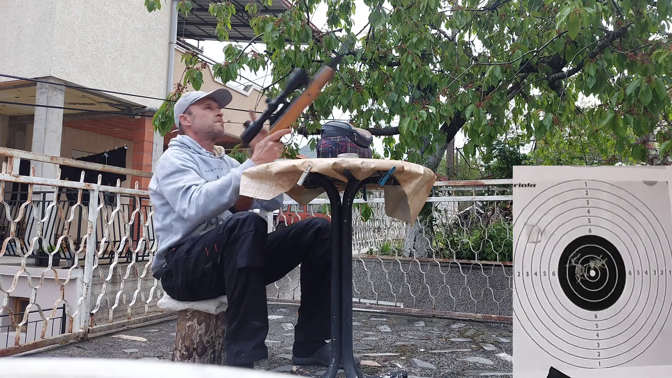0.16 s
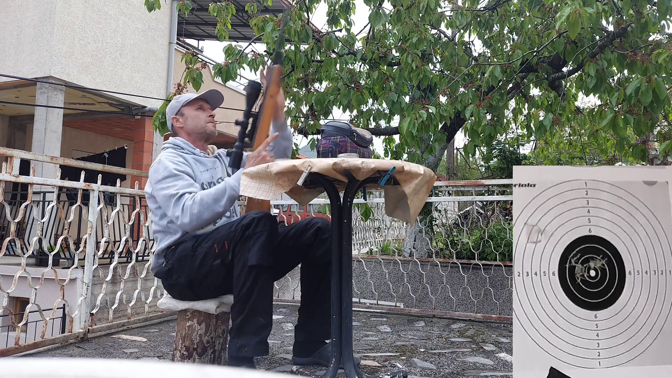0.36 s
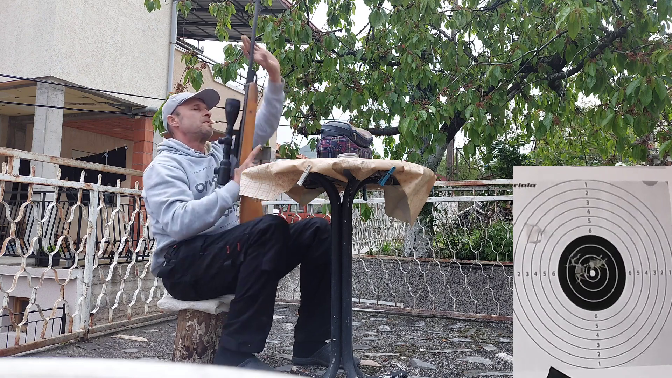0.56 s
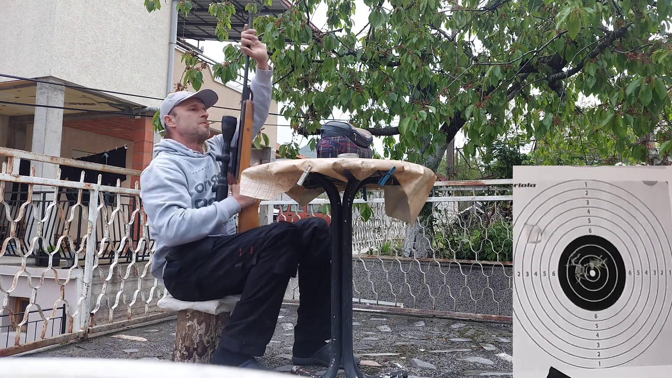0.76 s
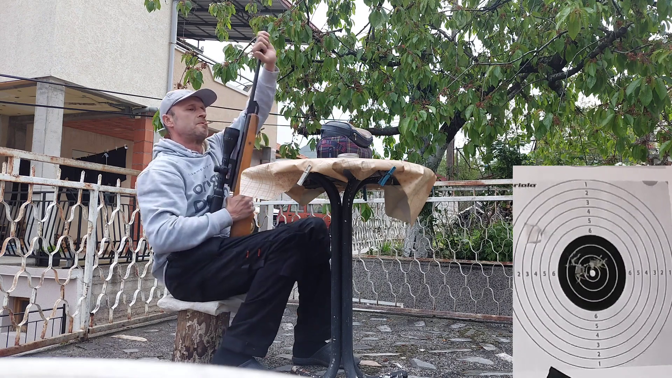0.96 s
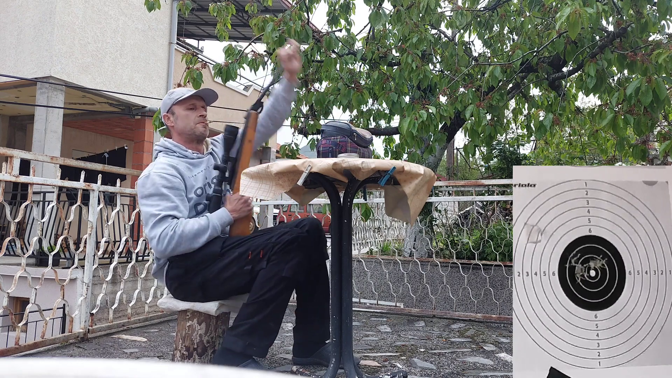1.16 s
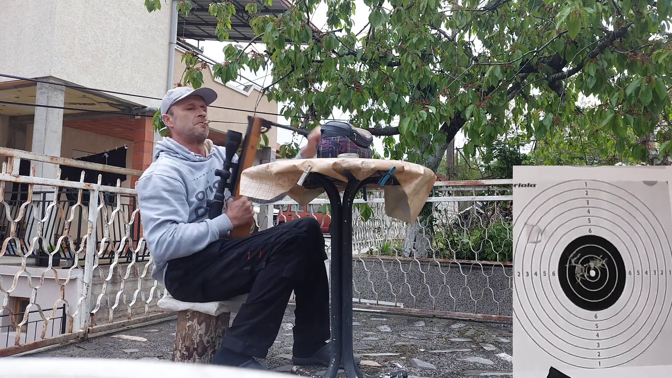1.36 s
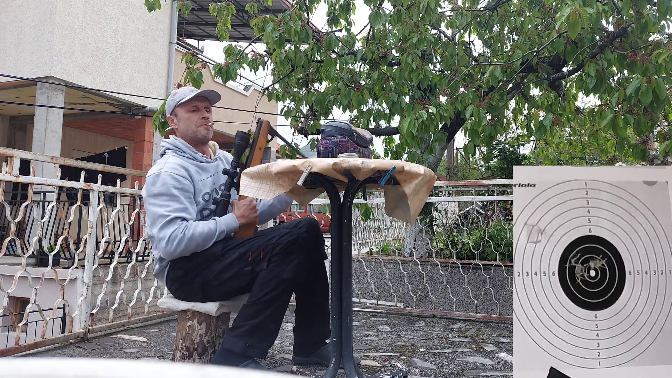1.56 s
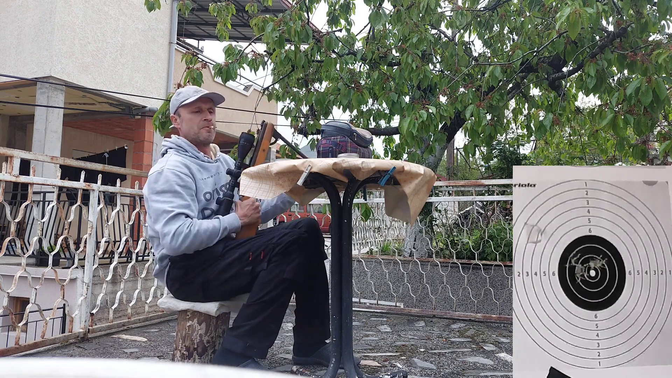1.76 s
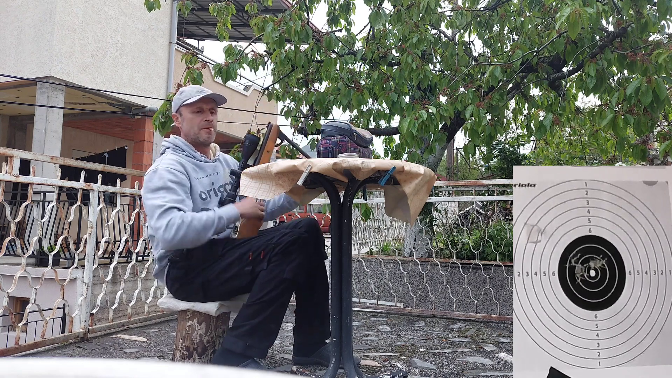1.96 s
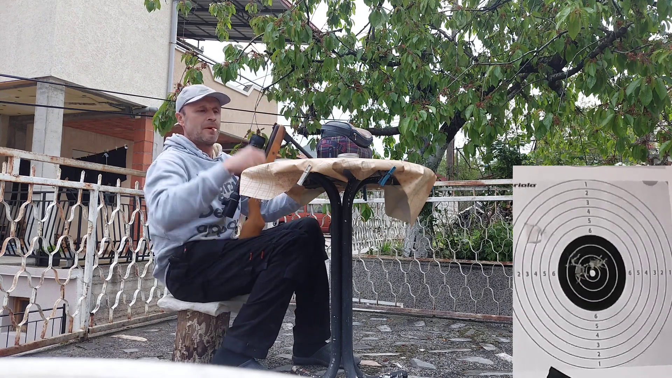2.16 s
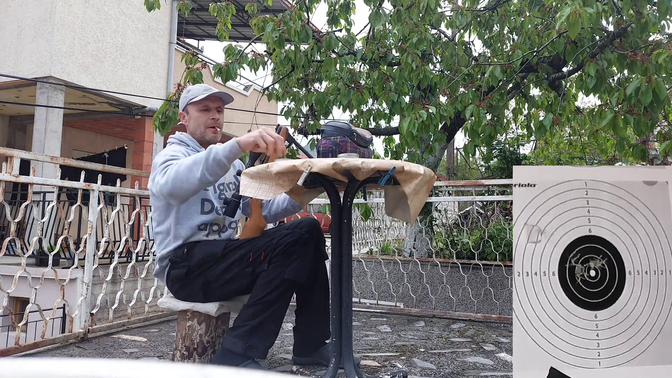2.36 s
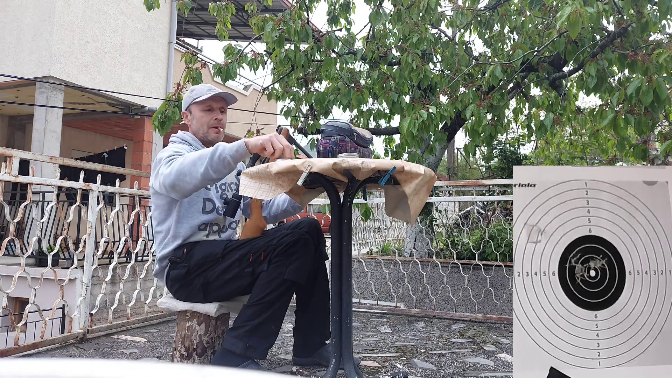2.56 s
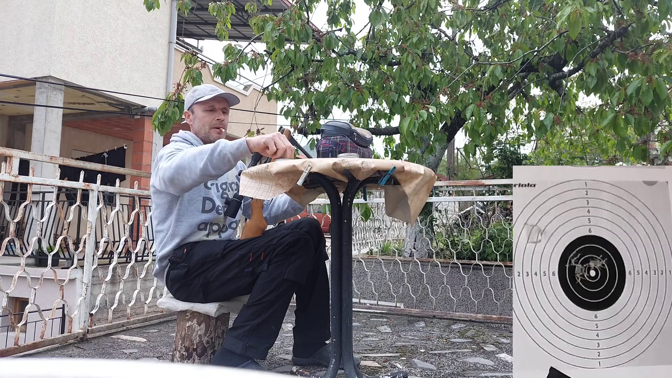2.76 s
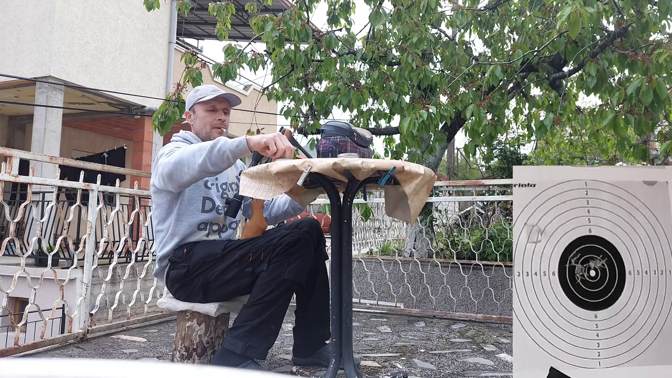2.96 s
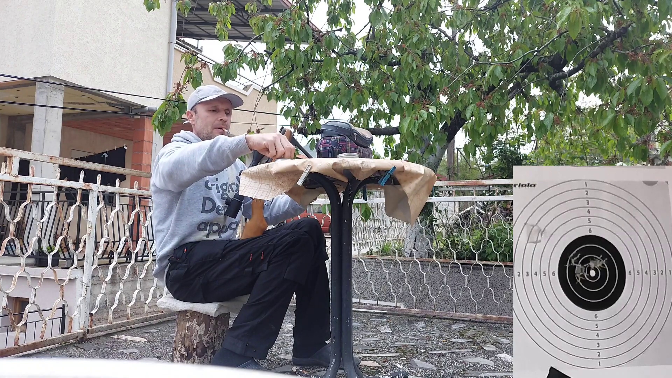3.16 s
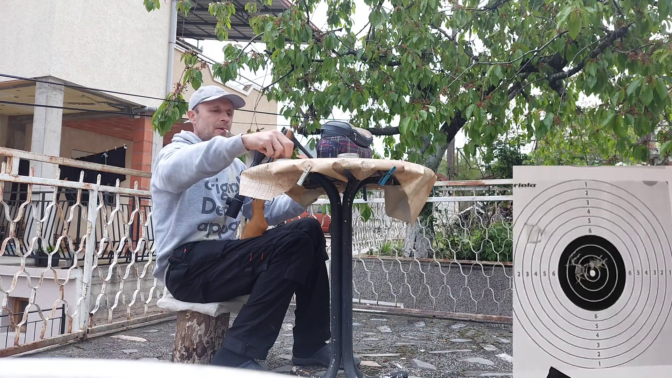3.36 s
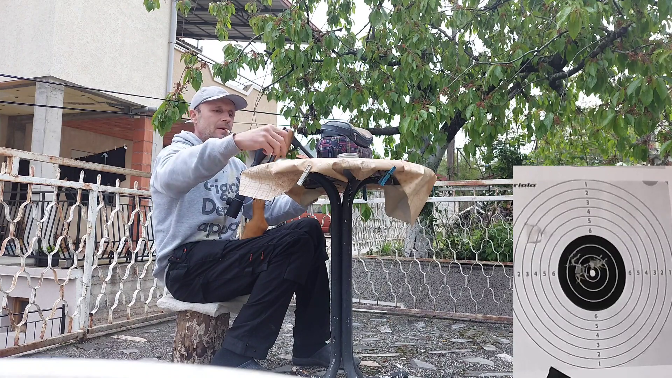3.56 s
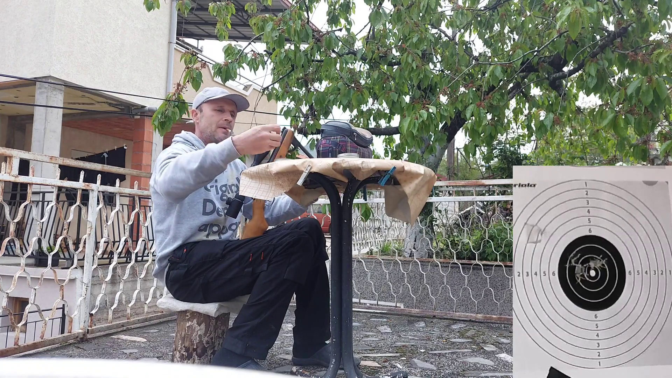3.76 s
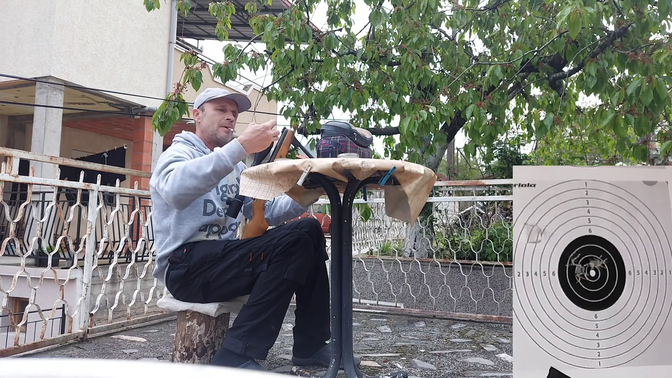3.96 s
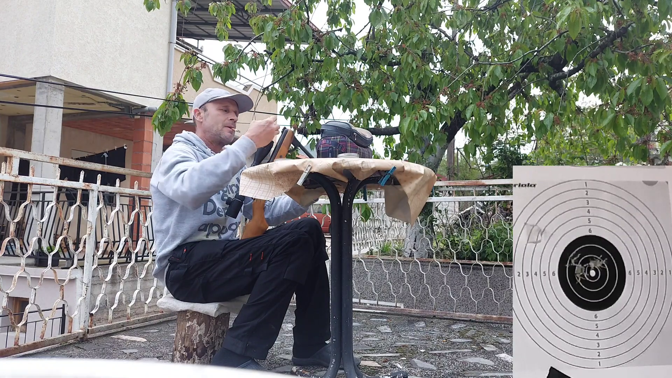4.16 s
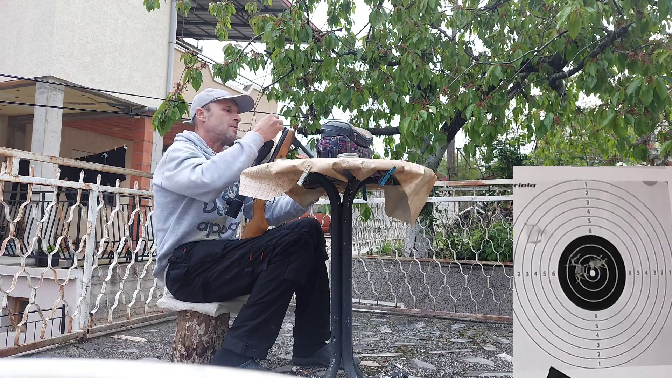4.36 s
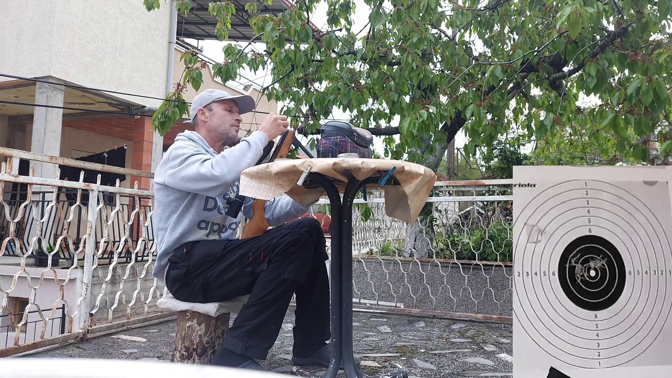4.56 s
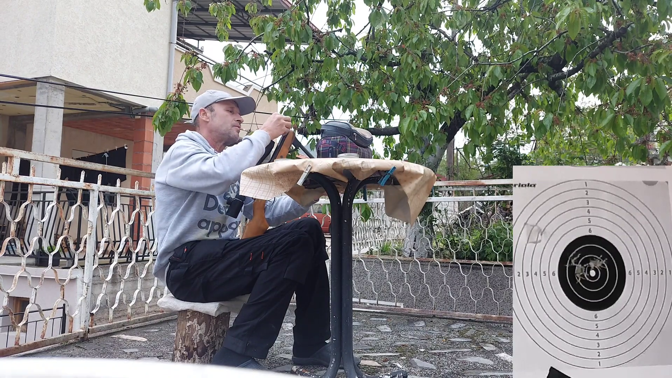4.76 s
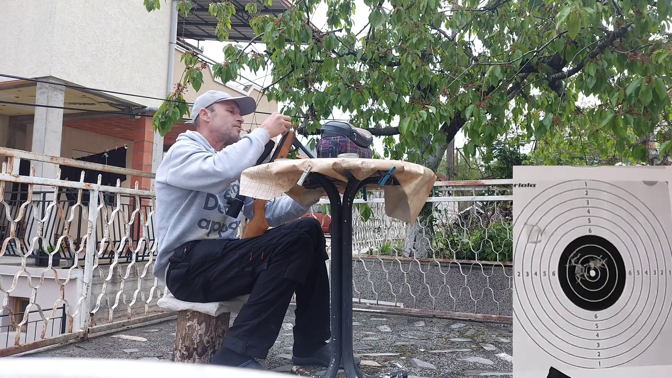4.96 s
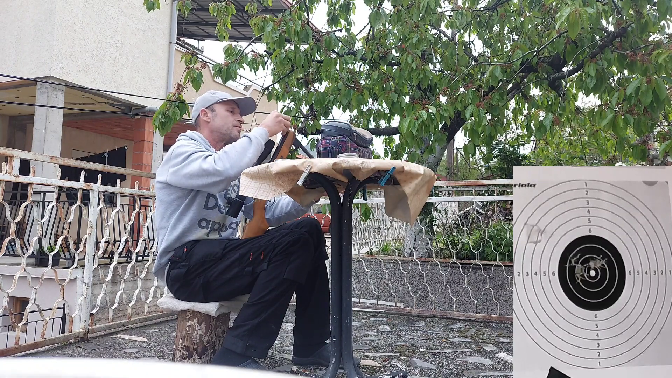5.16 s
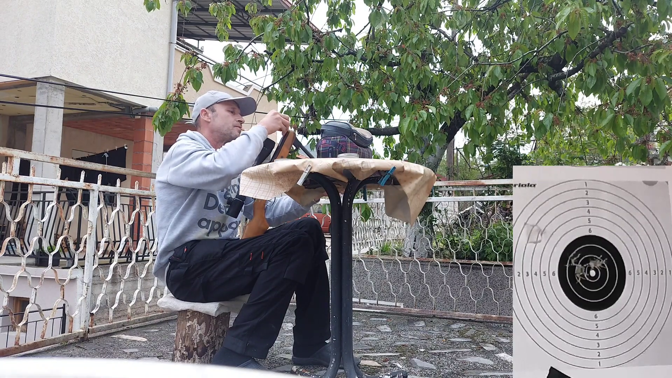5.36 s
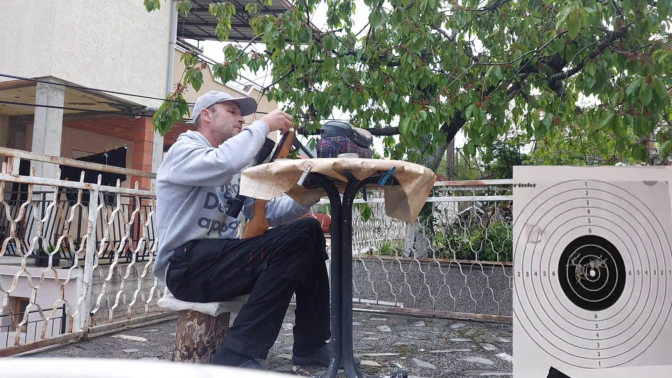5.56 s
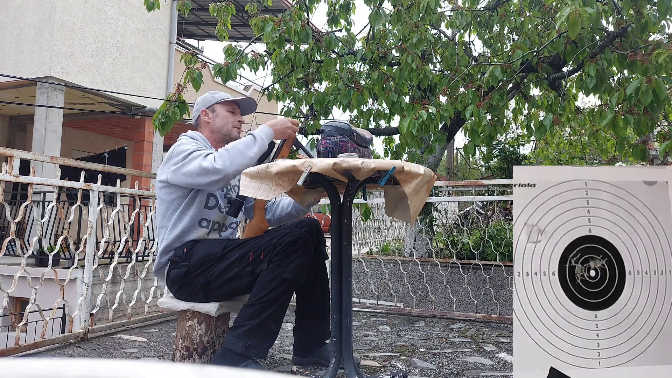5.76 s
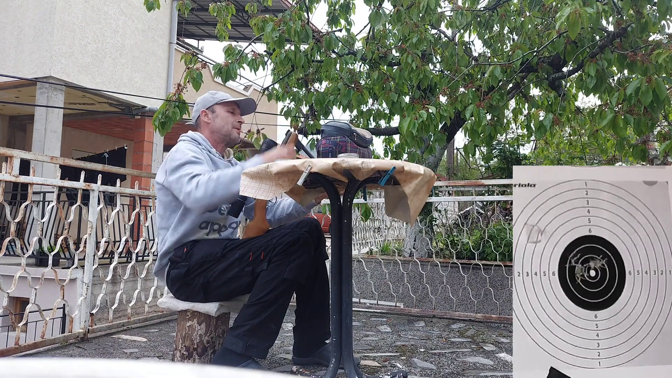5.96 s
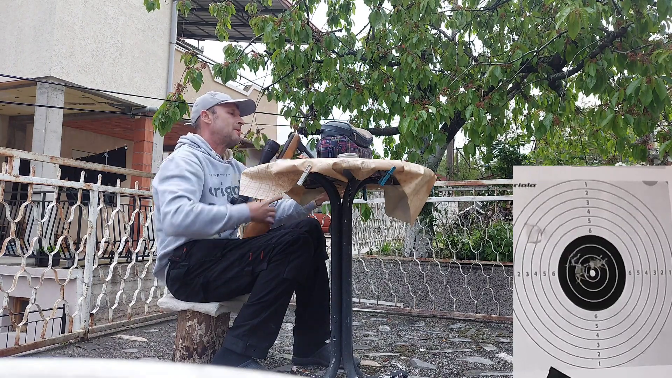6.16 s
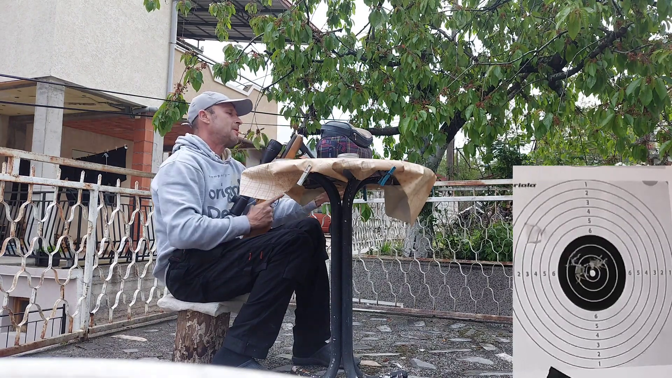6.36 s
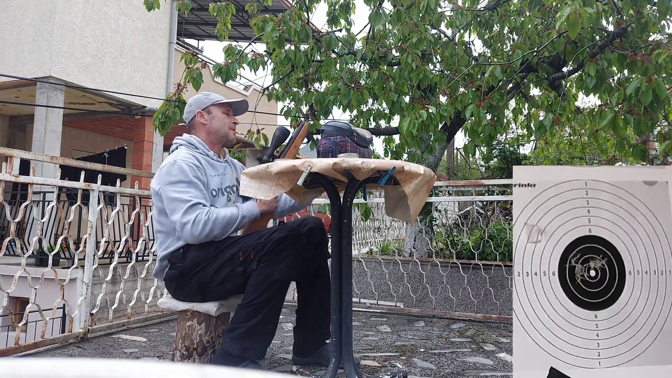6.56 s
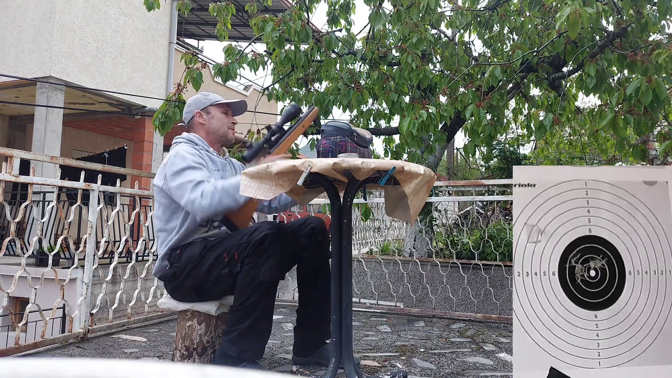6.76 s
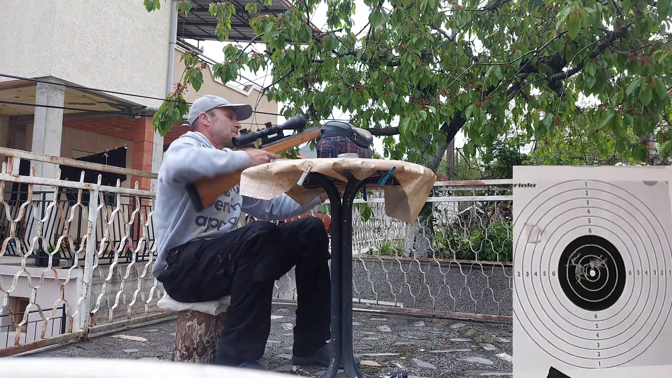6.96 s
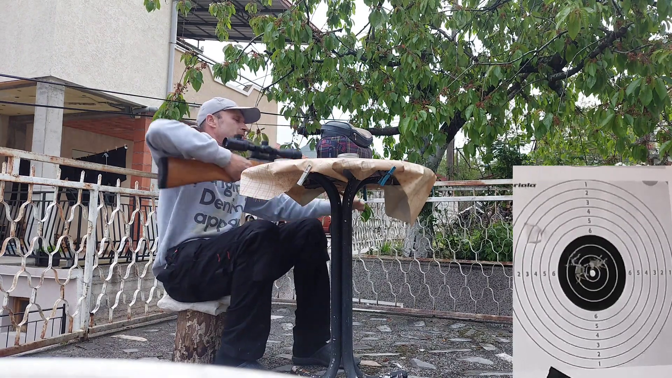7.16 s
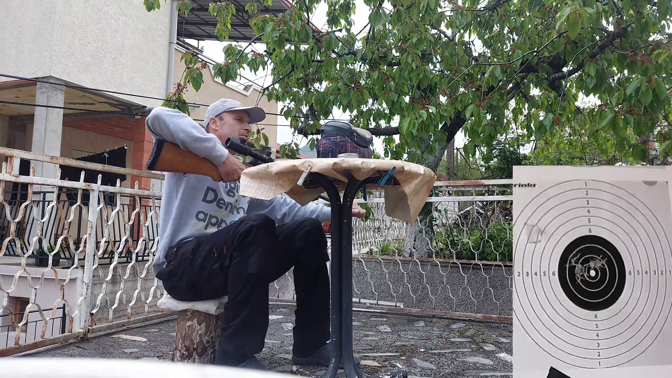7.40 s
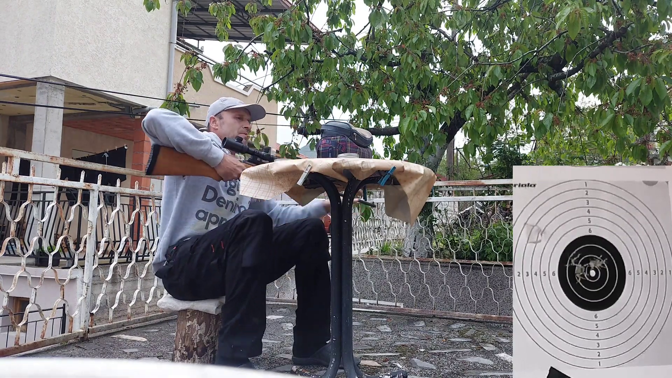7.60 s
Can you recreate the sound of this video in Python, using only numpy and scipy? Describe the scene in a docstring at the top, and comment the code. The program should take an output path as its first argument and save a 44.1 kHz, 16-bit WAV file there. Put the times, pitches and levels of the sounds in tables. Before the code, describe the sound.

A quiet paved yard with low, soft town rumble, faint machine hum and far songbirds whistling gliding notes around a thin high peep or two. From 0.7 to 1.0 s come light steel ticks and sleeve rustle, then at about 1.2 s a very loud, bright double clack as an air rifle is cocked, with a short splashy reflection from ground and walls. A smaller click and butt bumps follow at 1.6-1.8 s. From 2.5 to 3.5 s fingers rummage, grainy, with small tinny taps in a pellet tin; a faint low gust passes between 2.5 and 5 s. A nearby sparrow, to the left, gives rapid husky upward chirrups at 4.9-5.4 and 5.6-5.8 s. Cloth rubs softly from 6.2 s, small clicks come at 7.0 s, and at 7.3 s the barrel shuts with a hard steel clack and woody thump, then faint ticks.

```python
"""A break-barrel air rifle is cocked, loaded and shut close to the microphones in a paved yard: sharp cracks ring
steel, wooden stock and tin modes, and the butt bumps in low decaying tones. Sleeves, rummaging fingers and clacks
dying away are grainy filtered noise. A sparrow chirps close by in runs of short upward sweeps, far songbirds whistle
gliding tones and the town is patchy noise with machine tones and one gust. Ground and house walls answer rifle,
bumps and birds with reflections and noise tails; two spaced microphones listen."""
import sys
import numpy as np
from scipy import signal
from scipy.fft import rfft, irfft, next_fast_len
from scipy.io import wavfile
from scipy.ndimage import uniform_filter1d, map_coordinates

SR = 44100
rng = np.random.default_rng(int(sys.argv[2]) if len(sys.argv) > 2 else 0)


def output_pcm(signal):
    """Save a mono or channel-first signal as 16-bit PCM at the path in sys.argv[1].

    Samples are clipped to [-1, 1] before scaling.
    """
    pcm = np.clip(np.atleast_2d(signal).T, -1, 1) * 32767
    wavfile.write(sys.argv[1], SR, np.round(pcm).astype(np.int16))


def level_to_linear(level):
    """Convert decibel levels to linear amplitude factors, elementwise."""
    exponent = np.asarray(level, float) / 20
    return 10 ** exponent


N = 336615  # length in samples


def unit(x):
    """Scaled to rms 1."""
    return x / np.sqrt(np.mean(x ** 2) + 1e-20)


def along(points, hz):
    """Values at hz from (f/Hz, value) points, interpolated on a log frequency axis."""
    f, v = np.transpose(points)
    return np.interp(np.log(hz + 1), np.log(f + 1), v)


def wobble(rate):
    """A smooth random curve, rate knots a second."""
    knots = rng.standard_normal(int(N * rate / SR) + 4)
    return map_coordinates(knots, [np.arange(N) * rate / SR])


def filtered(x, response):
    """x times a complex response of frequency."""
    n = x.shape[-1]
    m = next_fast_len(n + 4096)
    return irfft(rfft(x, m) * response(np.fft.rfftfreq(m, 1 / SR)), m)[..., :n]


def peak(f, hz, width):
    """One causal resonance at hz, as a second-order band-pass response."""
    return 1j * f * width / (hz * hz - f * f + 1j * f * width)


def resonant(x, modes):
    """x rung through (f/Hz, width/Hz, level/dB) resonances of alternating sign."""
    def response(f):
        return sum((-1) ** k * level_to_linear(db) * peak(f, hz, width) for k, (hz, width, db) in enumerate(modes))
    return filtered(x, response)


def spans(tables):
    """A gate that is open inside several short curves, and their columns sample by sample."""
    t = np.arange(N) / SR
    rows = np.concatenate([np.array(r) for r in tables])
    gate = sum(np.clip(np.minimum(t - r[0][0], r[-1][0] - t) / .015, 0, 1) for r in tables)
    return gate, [np.interp(t, rows[:, 0], column) for column in rows.T[1:]]


def arch(start, length, peak_share, levels_db, *glides):
    """Three curve rows for one gesture: start, peak, end; the other columns glide evenly."""
    at = np.array([0, np.clip(peak_share, .05, .95), 1])
    return np.transpose([start + length * at, levels_db] + [a + (b - a) * at for a, b in glides])


def rush(spectrum, patchy_db):
    """Stereo noise of rms 1 in slow patches, its left-right likeness set by frequency."""
    # likeness of two spaced microphones in distant sound: [f/Hz, correlation]
    likeness = [(60, 0.46), (150, 0.53), (400, .6), (800, 0.59), (1500, 0.041)]
    z = signal.stft(rng.standard_normal((2, N)), nperseg=1024)[2]
    patches = uniform_filter1d(uniform_filter1d(rng.standard_normal(z.shape[1:]), 6, 0), 10, 1)
    pair = signal.istft(z * level_to_linear(patchy_db * unit(patches)), nperseg=1024)[1][:, :N]

    def mid_side(hz):
        turn = np.arccos(np.clip(along(likeness, hz), -1, 1)) / 2
        return level_to_linear(along(spectrum, hz)) * [np.cos(turn), np.sin(turn)]
    mid, side = filtered(pair, mid_side)
    return unit(np.array([mid + side, mid - side]))


def walls(x, delay_s, longer, piece_s=.25):
    """Diffuse answer of the yard: noise tails, a new one per channel for each stretch of sound."""
    # decay off the house walls, stretched by longer and cut shorter late on: [f/Hz, basic t60/s]
    yard_t60 = [(200, 0.41), (800, 0.17), (2000, 0.3), (5500, 0.29), (14000, 0.22)]
    out, step = np.zeros((2, N + 2 * SR)), int(piece_s * SR)
    for i in range(0, N, step):
        hz, t, z = signal.stft(rng.standard_normal((2, SR // 2)), SR, nperseg=256)
        decay_db = -60 * t / (longer * along(yard_t60, hz)[:, None]) - 300 * (t / longer) ** 2
        tail = signal.istft(z * level_to_linear(decay_db), SR, nperseg=256)[1]
        # single surfaces stand out, each for 66 samples
        surfaces = np.repeat(level_to_linear(4 * rng.standard_normal((2, 400))), 66, axis=1)
        tail *= surfaces[:, :tail.shape[1]]
        tail /= np.linalg.norm(tail[0])
        wet = signal.fftconvolve(np.atleast_2d(x)[:, i:i + step], tail, axes=1)
        out[:, i + int(delay_s * SR):][:, :wet.shape[1]] += wet
    return out[:, :N]


def machine_hum():
    """Unsteady far machine tones: narrow bands of noise, equal at both microphones."""
    # [f/Hz, width/Hz, level/dB]
    tones = [(162, 6, -83), (375, 63, -79), (457.5, 3.6, -77.5), (1220, 120, -85.5), (9880, 150, -95),
             (11400, 140, -96)]

    def tone(hz, width):
        return unit(filtered(rng.standard_normal(N), lambda f: np.exp(-((f - hz) / width) ** 2)))
    return sum(level_to_linear(db) * tone(hz, width) for hz, width, db in tones)


def wind_gust():
    """A puff of wind on the microphones: patchy bass noise of uneven level."""
    # [start t/s, length/s, level/dB, unevenness/dB]
    start, length, db, uneven_db = (2.5, 2.47, -78, 4)
    blowing = spans([[(start,), (start + length,)]])[0]
    gust_db = db + uneven_db * wobble(4.8)
    bass = [(10, -20), (30, 0), (50, -2), (120, -15), (300, -60)]  # f/Hz, relative level/dB
    return blowing * level_to_linear(gust_db) * rush(bass, patchy_db=3)


def town():
    """Far traffic and air as two patchy noises of drifting level, with machine tones and one gust."""
    # spectra of the low rumble and of the town above it: [f/Hz, relative level/dB]
    rumble_spectrum = [(12, -45), (20, -12), (86, -1), (140, -3), (203, -13), (260, -14.5), (340, -39.5),
                       (570, -120)]
    town_spectrum = [(120, -29), (200, -7.5), (459, -1), (551, -8.5), (1150, -20), (1260, -25.5),
                     (2040, -20), (2500, -26.5), (3060, -29.5), (3750, -30), (4190, -30), (5730, -31),
                     (9970, -32), (15200, -36.5), (16400, -48)]
    # their drift: [t/s, rumble level/dB, town level/dB]
    drift = [(0, -69, -69.5), (.5, -69.5, -67), (1.2, -67, -65.5), (1.45, -68.5, -63), (2.0, -70, -69.5),
             (2.9, -71, -68), (3.75, -66.5, -69), (4.7, -70, -69), (5.6, -68, -68), (6.1, -73.5, -69),
             (6.85, -69.5, -68), (7.63, -71, -65.5)]
    rumble_db, town_db = spans([drift])[1]
    rumble = level_to_linear(rumble_db) * rush(rumble_spectrum, patchy_db=1.77)
    air = level_to_linear(town_db) * rush(town_spectrum, patchy_db=2.5)
    return rumble + air + wind_gust() + machine_hum()


def whistle(notes, waver):
    """Slightly unsteady pure tones that swell, glide and fade."""
    swell_share = .3
    shape_db = np.array([-2, 0, -8])  # start, peak, end
    curves = [arch(s, length, swell_share, db + shape_db, (first, last)) for s, length, first, last, db in notes]
    gate, (db, hz) = spans(curves)
    phase = 2 * np.pi * np.cumsum(hz * (1 + waver * wobble(40))) / SR
    return gate * level_to_linear(db + 3 * wobble(35)) * np.sqrt(2) * np.sin(phase)


def far_songbirds():
    """Far whistled notes, near-pure tones around 2 kHz."""
    # [start t/s, length/s, first f/Hz, last f/Hz, level before distance/dB]
    notes = [(.27, .14, 2040, 2000, -79), (.46, .09, 2007, 2100, -78), (.55, .14, 2304, 2505, -82),
             (.75, 0.15, 2032, 2000, -75), (1.3, 0.19, 2080, 2124, -86), (2.28, 0.15, 2050, 2040, -83.5),
             (2.455, .04, 2910, 2860, -81), (3.52, 0.11, 1870, 1850, -79), (3.9, .1, 2100, 2000, -80),
             (4.08, .07, 1960, 1900, -83), (4.34, 0.21, 2322, 1940, -75.5), (4.57, .12, 2170, 2000, -82),
             (4.78, 0.13, 2637, 2190, -80), (5.4, 0.2, 2051, 1840, -75.5), (5.71, 0.15, 1930, 1750, -80),
             (5.985, 0.054, 2000, 2330, -76.5), (6.036, .15, 2330, 2480, -83),
             (7.5, 0.12, 2160, 2140, -74.5)]
    return whistle(notes, waver=.014)


def thin_calls():
    """Thin high bird calls, short near-pure tones."""
    # [start t/s, length/s, first f/Hz, last f/Hz, level before distance/dB]
    notes = [(.02, 0.23, 7100, 6440, -82), (.33, 0.12, 4210, 3920, -74), (.87, .09, 4030, 3900, -71),
             (1.08, .05, 4070, 4000, -73.5), (2.08, .09, 4240, 4283, -82), (2.32, .06, 5570, 5100, -74),
             (2.71, 0.074, 4100, 4080, -75.5), (3.63, .07, 5540, 4850, -80),
             (4.61, 0.035, 5400, 4750, -74.5)]
    return whistle(notes, waver=.012)


def sparrow():
    """Husky notes of a few milliseconds sweep upward, with a weak octave and a low edge; returned with
    the echoes by which branches and eaves repeat them."""
    # calls, each a run of short notes: [start t/s, notes, spacing/s, level/dB, growth a note/dB]
    calls = [(4.857, 5, .022, -53, 0.9), (4.982, 5, 0.019, -48, -1.55), (5.284, 5, 0.025, -72.5, 5.5),
             (5.584, 3, 0.019, -49, 1.3), (5.697, 3, 0.021, -43.5, -3)]
    # successive notes of a run: [middle f/Hz, level/dB]
    run = [(4430, -10), (5054, -0.5), (4640, -0.6), (4360, -5.5), (4650, -9.5)]
    half_note_s = 0.0029  # from the middle to 1/e
    out, t = np.zeros(N), np.arange(-330, 330) / SR
    husk = 1 + .95 * wobble(1200)
    notes = []
    for s, count, gap, db, growth_db in calls:
        for k in range(round(count)):
            hz, note_db = run[k]
            notes.append((s + k * gap, db + growth_db * k + note_db, hz))
    # a weaker close echo follows each note within a few milliseconds, its pitch slightly varied
    close_echoes = [(s + rng.uniform(.003, .00564), db - 5, hz * rng.uniform(1, 1.12)) for s, db, hz in notes]
    for s, db, hz in notes + close_echoes:
        sweep = rng.uniform(0.88e5, 3.3e5)  # Hz per second
        phase = 2 * np.pi * (hz * t + sweep / 2 * t * t) + rng.uniform(0, 6)
        note = np.exp(-(t / half_note_s) ** 2) * (np.sin(phase) + level_to_linear(-27.5) * np.sin(2 * phase))
        edge = level_to_linear(-17) * np.exp(-((t + .002) / .002) ** 2) * np.sin(.72 * phase)
        out[round((s + .0027) * SR) - 330:][:len(t)] += level_to_linear(db) * (note + edge)
    # the small throat radiates little low down
    bird = husk * filtered(out, lambda f: 1 / (1 + (2900 / (f + 1)) ** 6))
    delays_s = rng.uniform(.055, .21, (2, 8)) ** 2
    echoes = [sum(level_to_linear(-13 - 170 * d) * np.roll(bird, int(d * SR)) for d in side) for side in delays_s]
    return bird, np.array(echoes)


def rubbing(tables, gusty_db, crackle_db):
    """Grainy rubbing: separate noise at each microphone in shared uneven gusts."""
    # spectra of the body, the hiss and a dull rub: [f/Hz, relative level/dB]
    body = [(800, -10.5), (1300, -2.5), (2200, 0.5), (4500, -7.5), (7000, -24.5)]
    hiss = [(3000, -14.5), (5000, -1), (9000, -4.5), (13000, -3), (15500, -10.5), (17000, -55)]
    dull_rub = [(350, -29.5), (600, -0.5), (1000, -7), (1500, -24.5)]
    gate, (body_db, hiss_db) = spans(tables)
    levels_db = body_db, body_db + hiss_db, body_db - 1.3
    grain = level_to_linear(gusty_db * wobble(40) + crackle_db * wobble(350))

    def layer(spectrum):
        return unit(filtered(grain * rng.standard_normal((2, N)), lambda hz: level_to_linear(along(spectrum, hz))))
    return gate * sum(level_to_linear(db) * layer(c) for db, c in zip(levels_db, (body, hiss, dull_rub)))


def sleeves_and_rummaging():
    """Grainy noise of sleeves, and of the clacks dying away in the yard; a hand rummages in cracklier grabs."""
    # sleeves and dying clacks, in stretches: [t/s, body level/dB, hiss over body/dB]
    rustle = [
        [(.22, -93.5, 14), (.33, -84, 5.5), (.43, -80, 1)],
        [(.55, -88, -3), (.582, -81, 9), (.758, -84, 9.5), (.775, -72, 4), (.83, -72.5, -4), (.968, -84, 10),
         (1.07, -104, -2), (1.12, -84, 2.1)],
        [(1.28, -60, -13), (1.34, -67, -2), (1.44, -78.5, 5.5), (1.576, -72, -9), (1.624, -55.5, -1.1),
         (1.7, -107, -21), (1.774, -64, 4.5), (1.79, -74.5, -2.5), (2.0, -91.5, 9)],
        [(6.15, -87.5, 3), (6.3, -85, 10.5), (6.38, -82, 15), (6.48, -78.5, 0.2), (6.62, -69, -3.5),
         (6.75, -81.5, -3), (6.96, -84, -15), (6.99, -71, 5), (7.08, -61, -18), (7.18, -74, -22),
         (7.22, -84, 1.1), (7.29, -80, -7.5)],
    ]
    # rummaging for pellets, one grab a row: [start t/s, length/s, peak body level/dB, hiss over body/dB]
    rummage = [(2.508, 0.26, -65.5, -8), (2.762, 0.11, -72, -2.5), (2.867, 0.16, -72.5, -8),
               (3.113, 0.15, -81, -15), (3.337, 0.15, -67, -4.5)]
    peak_share, shape_db = 0.311, np.array([-7, 0, -17])  # shape: start, peak, end
    grabs = [arch(s, length, peak_share, db + shape_db, (hiss_db, hiss_db)) for s, length, db, hiss_db in rummage]
    return rubbing(rustle, gusty_db=2.0, crackle_db=2) + rubbing(grabs, gusty_db=1.5, crackle_db=3)


def bumps():
    """Soft wooden contacts: decaying low tones with a slow start."""
    # the butt bumps thigh and table: [t/s, low level/dB, mid level/dB]
    butt_bumps = [(.77, -58.5, -61), (1.13, -51.5, -58), (1.203, -55.5, -43), (1.62, -54.5, -45),
                  (1.767, -61, -53), (7.317, -42.5, -60)]
    # its low and mid tone: [f/Hz, t60/s]
    butt_modes = [(140, .1), (365, .055)]
    # short woody knocks: [t/s, level/dB, f/Hz]
    woody_knocks = [(3.384, -61, 1104), (6.877, -63, 2400), (7.062, -58.5, 2390), (4.62, -57, 628),
                    (6.5, -65.5, 607), (7.313, -37, 923)]
    out, t = np.zeros(N + SR), np.arange(SR // 3) / SR
    rings = [(s, db, *mode) for s, *levels in butt_bumps for db, mode in zip(levels, butt_modes)]
    rings += [(*knock, 0.089) for knock in woody_knocks]  # t60/s
    for s, db, hz, t60 in rings:
        ring = level_to_linear(db - 60 * t / t60) * np.sin(2 * np.pi * hz * t)
        out[round(s * SR):][:len(t)] += ring * (1 - np.exp(-t / .002))
    return out[:N]


def contacts(events, metal, rattle_s, crack, alike):
    """Each contact is a crack and a brief rattle that ring metal, stock, clank and sheen in their own proportions.
    Returns left, right and the average over all directions, which reaches the walls."""
    # modes of the wooden stock, the mid clank and the top sheen: [f/Hz, width/Hz, level/dB]
    stock = [(464, 510, -13.5), (828, 88, -1), (1180, 130, -5)]
    clank = [(1490, 460, -9.5), (2050, 400, 1), (3108, 1500, -7.5), (4300, 850, -6.5)]
    sheen = [(10500, 5400, -1.5), (12900, 3700, 2.5), (14540, 2000, -7)]
    out, t = np.zeros((3, N + SR)), np.arange(SR // 12) / SR
    turn = np.arccos(np.clip(alike, 0, 1)) / 2
    groups, f = (metal, stock, clank, sheen), np.fft.rfftfreq(len(t), 1 / SR)
    powers = [sum(np.abs(level_to_linear(db) * peak(f, hz, w)) ** 2 for hz, w, db in modes) for modes in groups]
    for s, db, stock_db, clank_db, sheen_db, pan_db in events:
        a, b = rng.standard_normal((2, 4, len(t))) * level_to_linear(-60 * (t / rattle_s) ** 2.3)
        a[:, 0] = crack
        # each side sees another face of the metal
        pair = np.array([np.cos(turn) * a + np.sin(turn) * b, np.cos(turn) * a - np.sin(turn) * b])
        rings = [resonant(pair[:, k], modes) for k, modes in enumerate(groups)]
        sizes_db = [0, stock_db, clank_db, sheen_db]
        rings = [level_to_linear(db + size) * r / np.abs(r).max() for size, r in zip(sizes_db, rings)]
        spread = np.sqrt(sum(len(t) * r.var() * p / p.mean() for r, p in zip(rings, powers)))
        start = round(s * SR)
        out[:2, start:start + len(t)] += sum(rings) * level_to_linear([[pan_db / 2], [-pan_db / 2]])
        # a symmetric pulse, shifted 4 ms to stand whole
        out[2, start:start + len(t)] += np.roll(irfft(spread, len(t)), shift=SR // 250)
    return out[:, :N]


def finger_taps():
    """Fingers on pellets, tin and table: soft contacts that ring the pellet tin, toward the left."""
    # [t/s, metal peak level/dB, stock knock/dB, mid clank/dB, top sheen/dB], the last three relative to the metal
    taps = [(2.5127, -59, -1, -9.5, -9), (2.5518, -54.5, -14, -4, -9), (2.5747, -60, -4, -7, -16),
            (2.616, -56.5, 3.5, 5, -6.5), (2.7994, -63, -19, -12.5, -20), (2.877, -55, -18, -9, -21),
            (2.9103, -53.5, -13, -10, -15), (3.0044, -63.5, -14, -7, -13.5), (3.1228, -65, -2.5, 1, -14),
            (3.1653, -62, -10.5, -1, -18), (3.2675, -62, -12, -7, -7), (3.3447, -52.5, 0, -21, -5.5),
            (3.3836, -56.5, 6.5, -7, -2), (3.4467, -64, -11, -10.5, -15.5), (6.8524, -68.5, 5.5, 4.5, -12),
            (6.873, -69.5, 5, 12.5, -23.5), (7.0594, -59, 2.5, 10, -5.5)]
    # pellet tin: [f/Hz, width/Hz, level/dB]
    tin = [(4100, 1340, -1.5), (5280, 800, 0.5), (6140, 1100, -5.5), (8400, 1800, -8)]
    pan_db = 5  # left over right
    return contacts([(*tap, pan_db) for tap in taps], tin, rattle_s=0.046, crack=5, alike=0.27)


def rifle():
    """Hard steel clacks of latch, barrel and sear; each is followed 6 ms later by a weaker, brighter
    reflection from ground or wall."""
    # [t/s, steel peak level/dB, stock knock/dB, top sheen/dB, left-right/dB], knock and sheen relative to the steel
    clacks = [(.726, -53.5, -11, -9, 6), (.766, -52, -11.5, 14.5, 8), (.948, -60, -12, 6, 12),
              (.996, -61, -14, 0.5, 8.5), (1.129, -46, -0.5, -4.5, 2), (1.174, -13, -20.5, -8, 4),
              (1.1946, -33, -20.5, 1.5, 3), (1.1964, -15, -6.5, 1.1, 2.5), (1.5912, -51, -14.5, -15, 1.1),
              (1.613, -35.5, -10.5, -6.5, 6.5), (1.64, -55, 11, -5, -3), (1.7675, -52, 6, -1.5, 10),
              (6.989, -52, -9, -6.5, 4), (7.0174, -42, -12, -3.14, -2.5), (7.188, -61.5, 18.5, -17, 6),
              (7.3058, -14, -19.5, -13.5, 6), (7.314, -23.5, -1.5, -2.5, 2.5),
              (7.3256, -22.5, -10.5, 5, -3), (7.575, -52, -18, -22, 9.5), (7.5904, -60.5, -5, -2.5, 8)]
    # [f/Hz, width/Hz, level/dB]
    steel = [(5100, 1300, -4), (6570, 440, -1), (7400, 900, 0.5), (8500, 1000, -8)]
    s, db, stock_db, sheen_db, pan_db = np.transpose(clacks)
    clank_db = 3.5 + 0.76 * stock_db + .3 * sheen_db  # the mid clank follows knock and sheen
    blows = np.transpose([s, db, stock_db, clank_db, sheen_db, pan_db])
    reflections = blows + [.0059, -11, 0, 0, 5, 0]  # later by s, weaker by dB, sheen up by dB
    return contacts(np.vstack([blows, reflections]), steel, rattle_s=.008, crack=1.9, alike=0.25)


def scene():
    """Rifle, bumps and sparrow are direct plus walls; the far whistles reach the microphones mostly off the walls."""
    # left-right balance of the microphones: [f/Hz, left over right/dB]
    balance = [(60, 8), (150, 8.5), (500, 3), (2400, 5.5), (8000, 5.5), (15000, -0.5)]
    left, right, spread = rifle() + finger_taps()
    bird, echoes = sparrow()
    soft, song, peeps = bumps(), far_songbirds(), thin_calls()
    far = level_to_linear(-8) * song + walls(song, delay_s=.01, longer=2.0) + level_to_linear(-7) * peeps
    wet = level_to_linear(-5.5) * walls(spread, delay_s=.0035, longer=1.065)
    wet = wet + level_to_linear(-4.5) * walls(soft, delay_s=.006, longer=1.0)
    wet = wet + echoes + level_to_linear(-9) * walls(bird + .6 * peeps, delay_s=.008, longer=1.7, piece_s=.1)
    ambience = wet + soft + far + sleeves_and_rummaging() + town()
    around = filtered(ambience, lambda hz: level_to_linear(along(balance, hz) * [[.5], [-.5]]))
    return around + [left, right] + bird * level_to_linear([[4], [-4]])  # the sparrow sits to the left


def top_cut(x):
    """Nothing passes above the cut-off."""
    return signal.sosfilt(signal.butter(12, 16790, fs=SR, output="sos"), x)


def record(dry):
    """The right microphone stands a hand farther away; the band ends at a sharp top limit."""
    right_lag_s, top_hz = 14 / SR, 16300

    def spacing(hz):
        return (hz < top_hz) * np.exp(2j * np.pi * hz * right_lag_s * np.array([[.5], [-.5]]))
    return top_cut(filtered(dry, spacing))


dry = scene()
out = record(dry)
output_pcm(out)
```